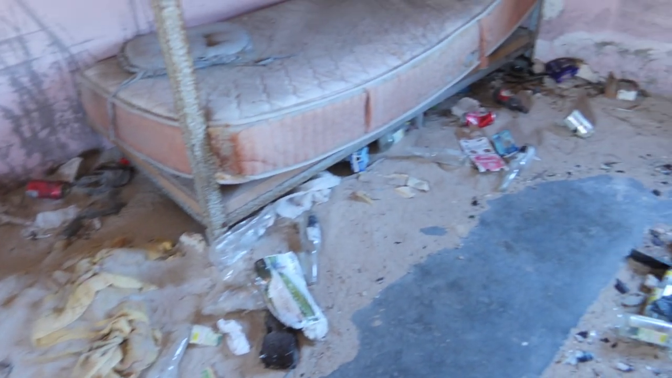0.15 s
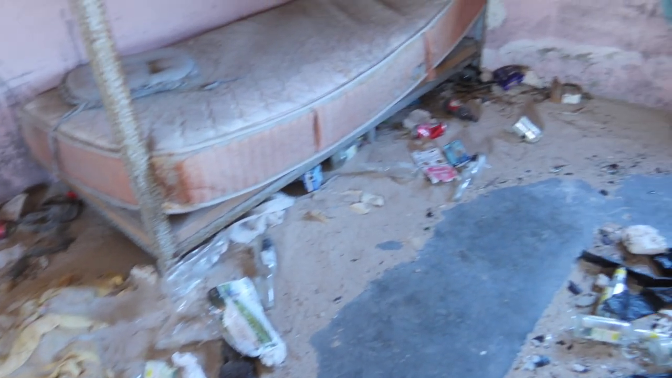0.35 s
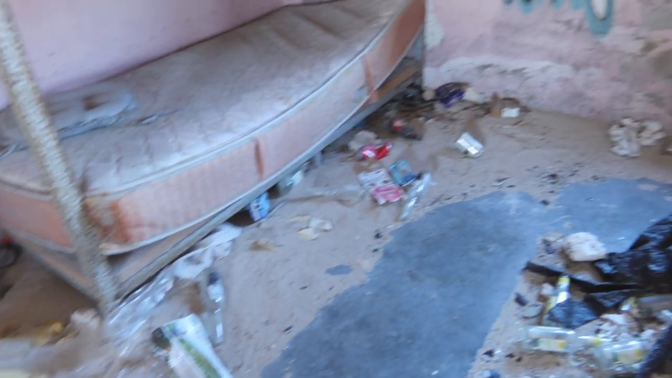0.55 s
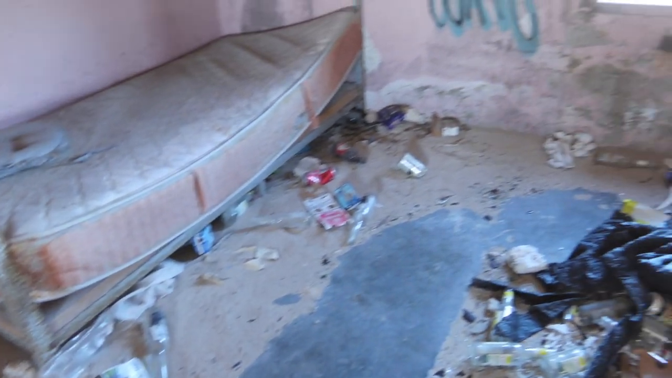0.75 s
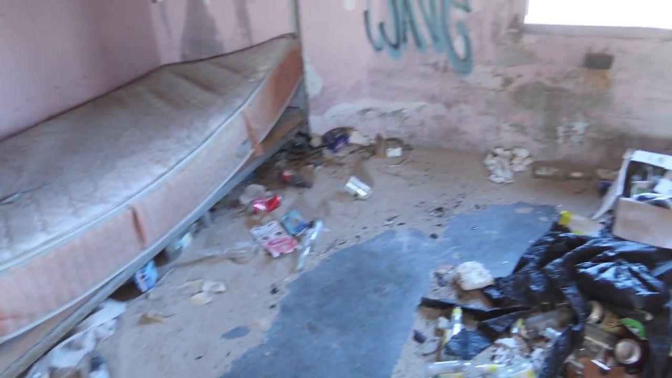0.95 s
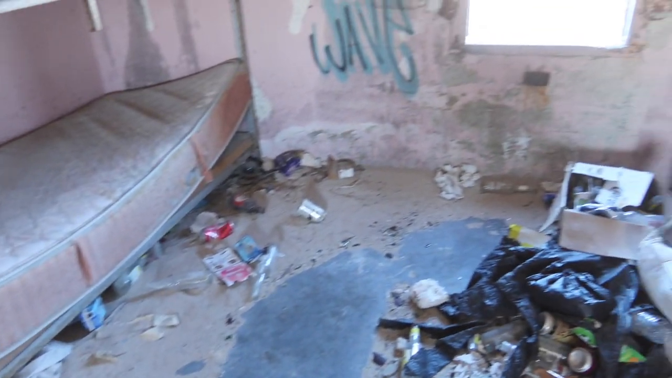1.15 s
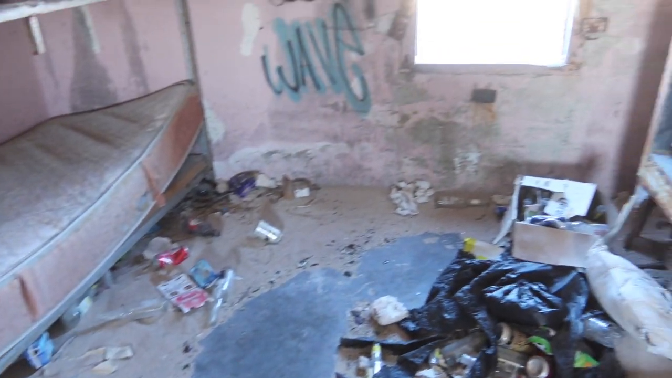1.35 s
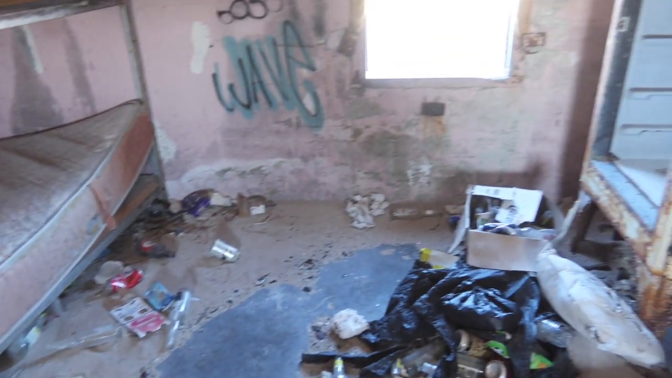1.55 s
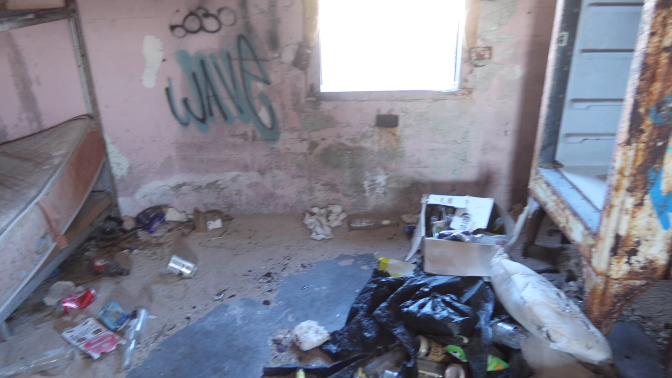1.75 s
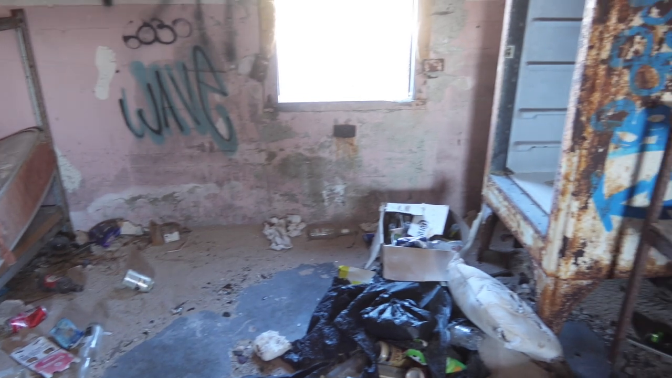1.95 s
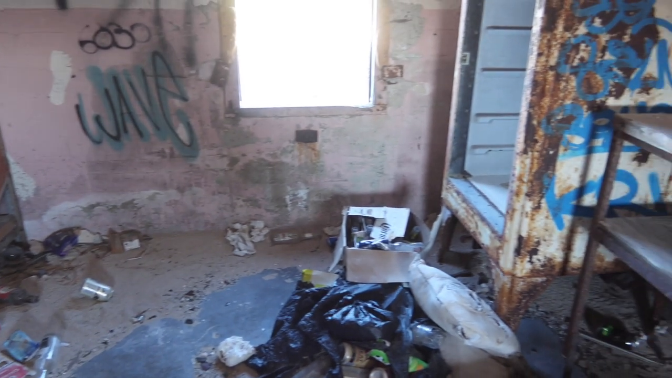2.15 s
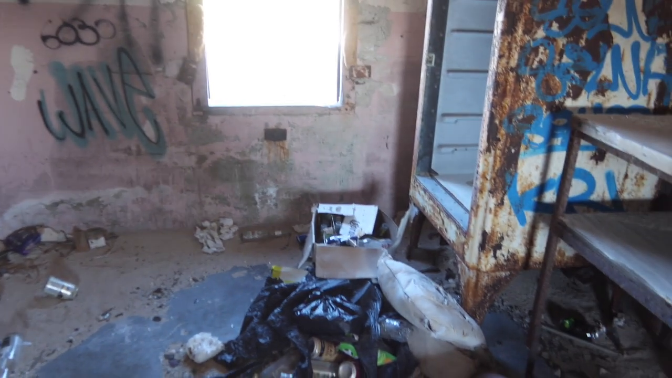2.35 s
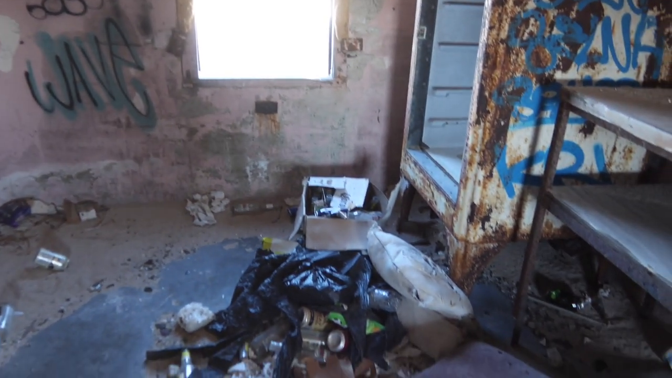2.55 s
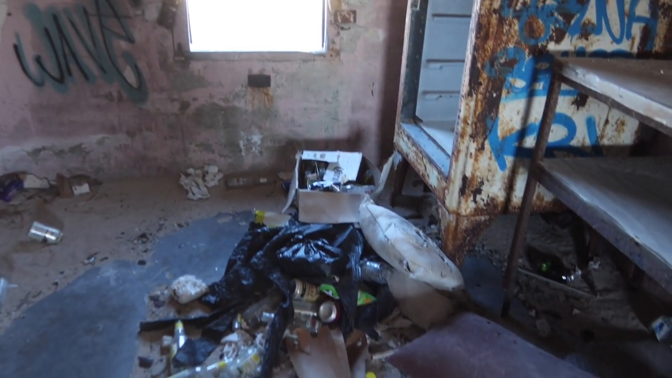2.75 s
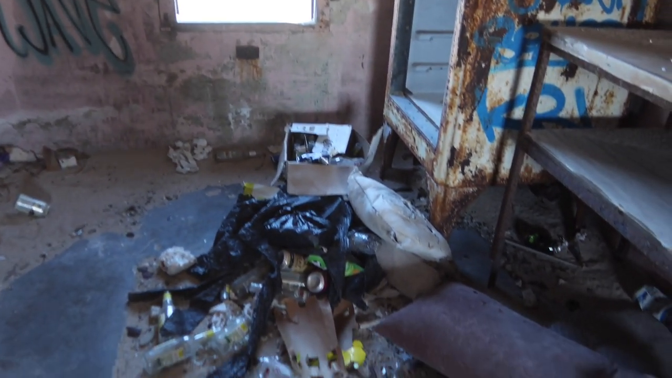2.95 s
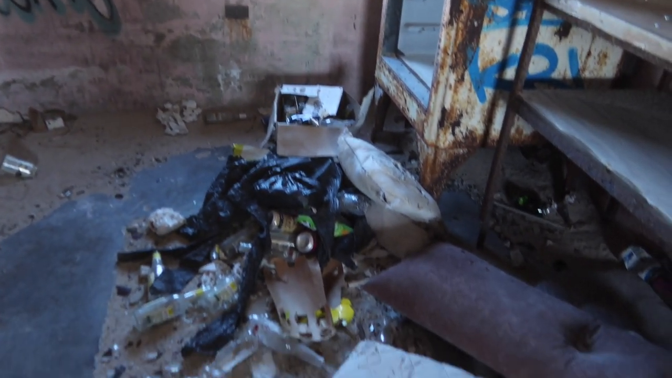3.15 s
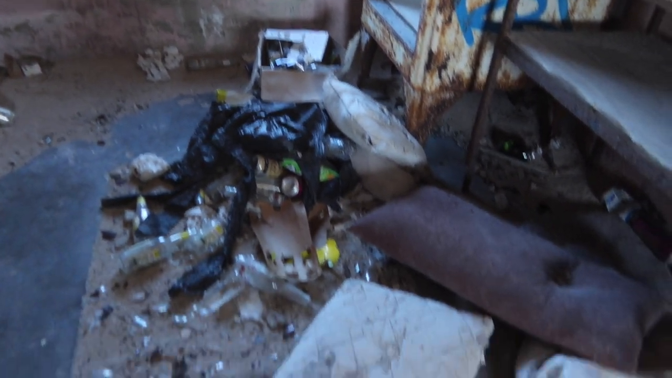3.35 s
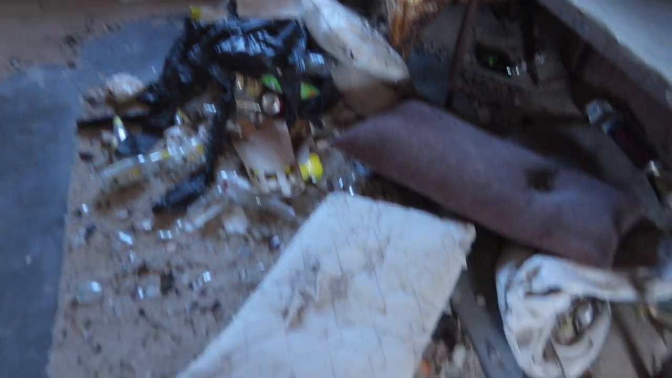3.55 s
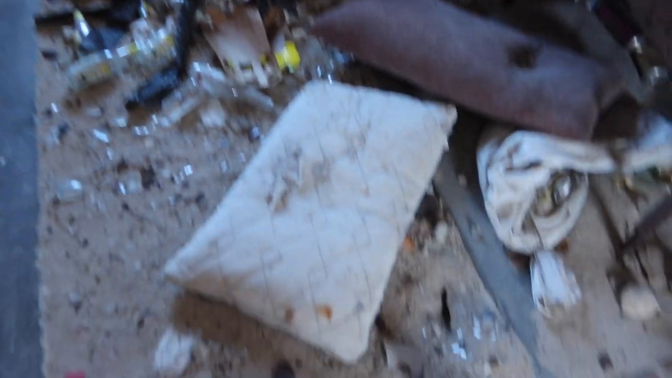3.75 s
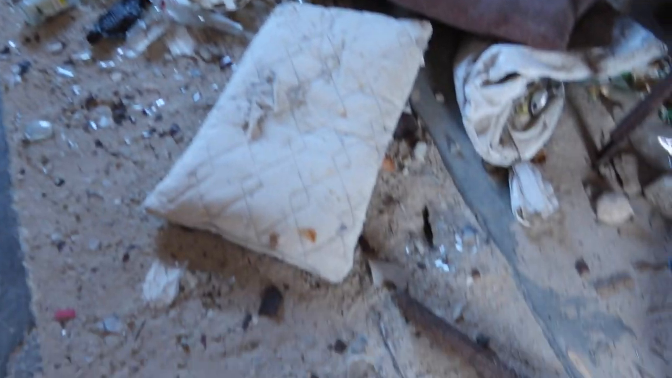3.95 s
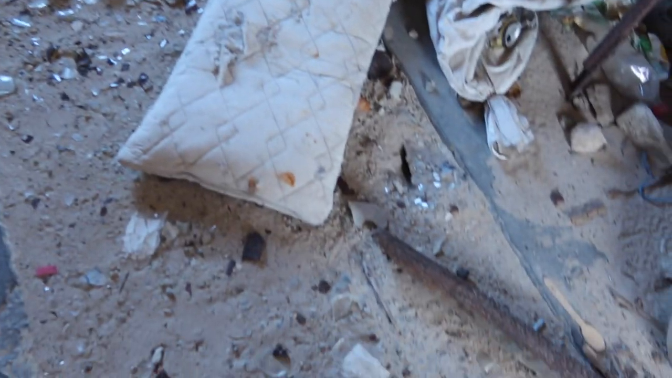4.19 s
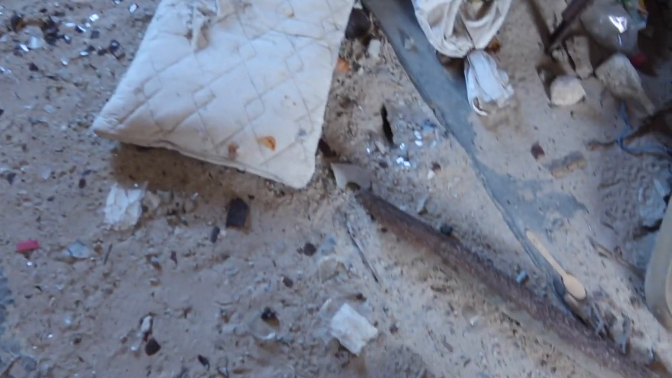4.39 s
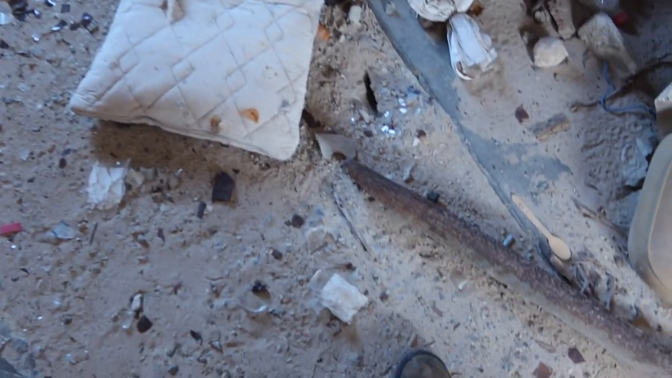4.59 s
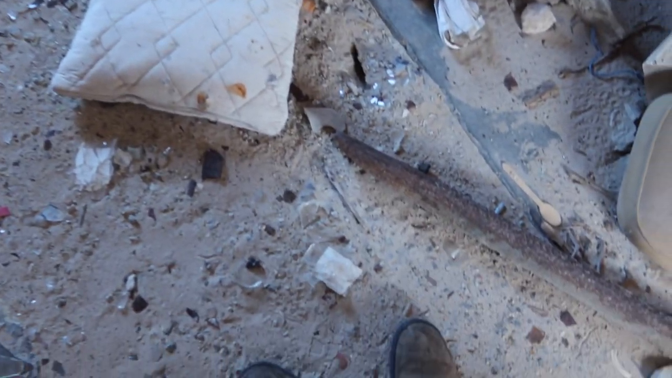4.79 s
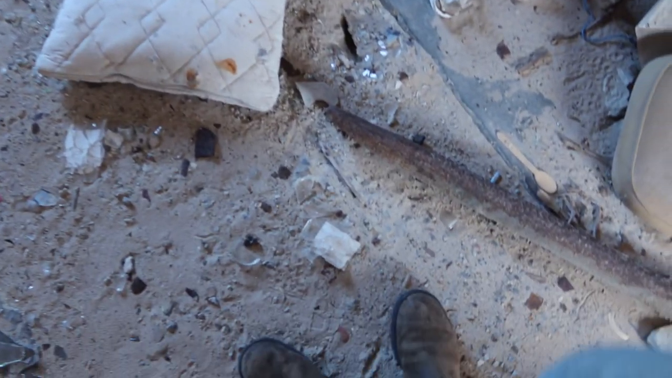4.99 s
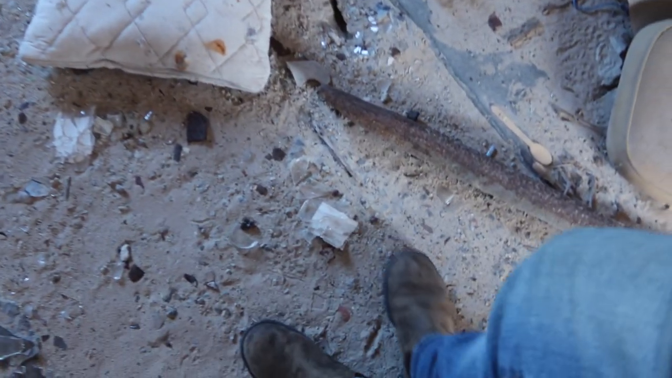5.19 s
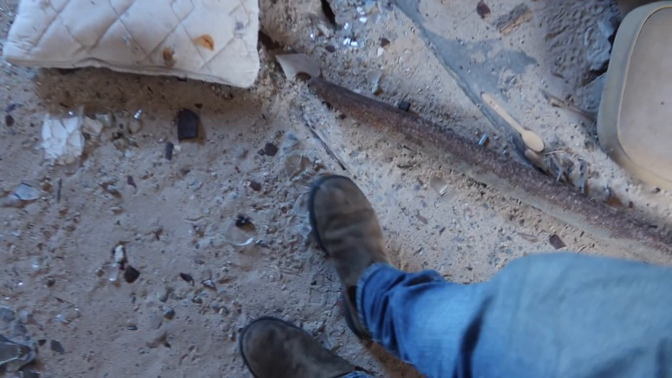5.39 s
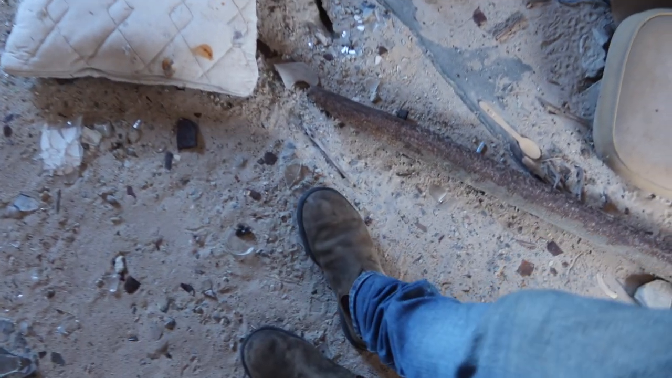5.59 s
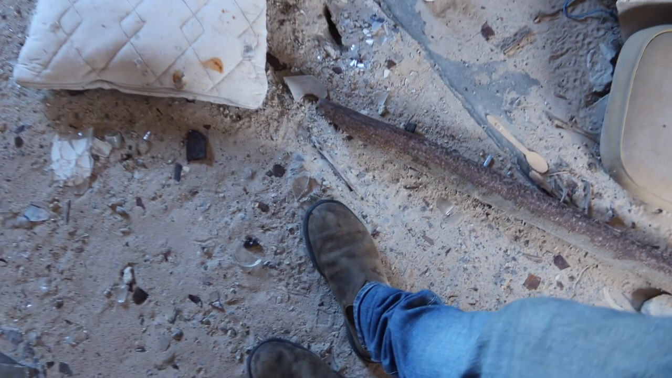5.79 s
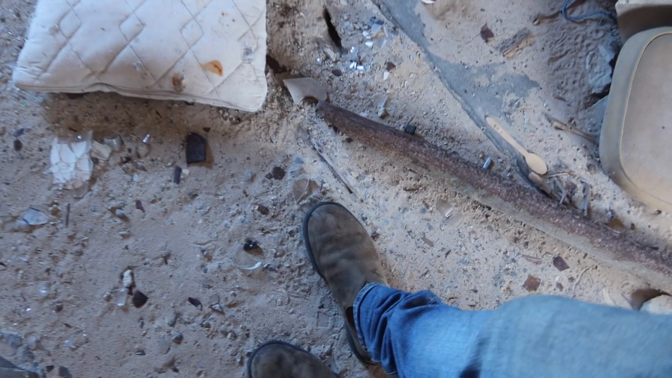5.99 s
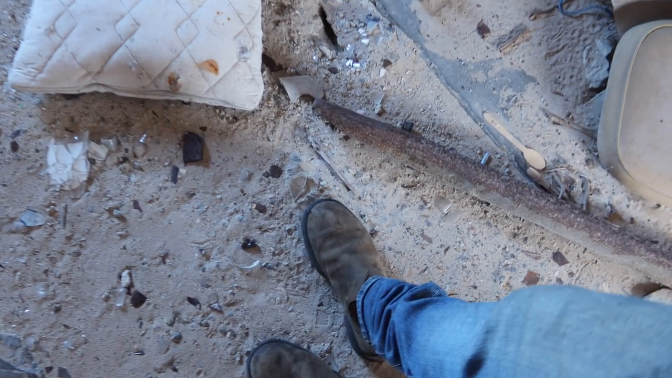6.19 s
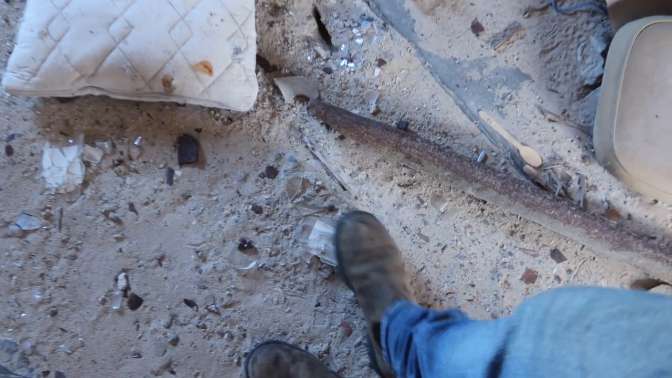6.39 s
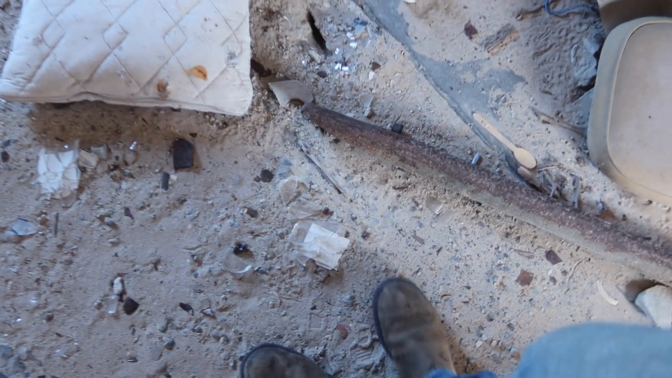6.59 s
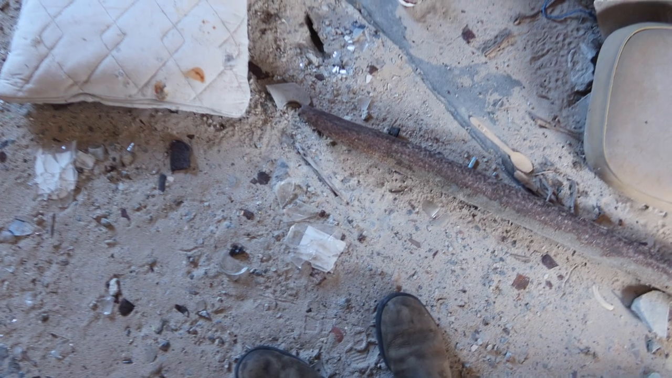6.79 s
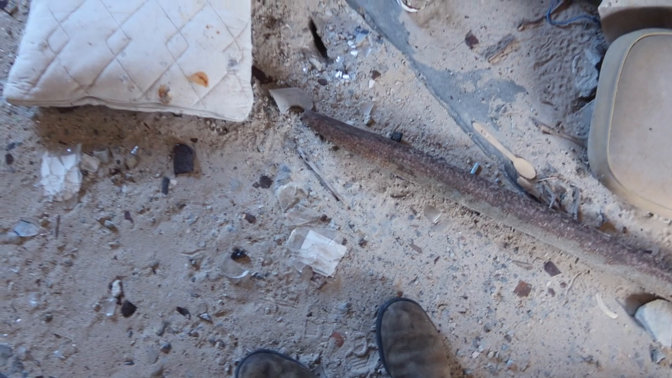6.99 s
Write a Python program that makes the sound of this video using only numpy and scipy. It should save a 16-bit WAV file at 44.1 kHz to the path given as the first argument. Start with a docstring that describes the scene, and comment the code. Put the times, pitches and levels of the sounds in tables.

```python
"""An empty room with a concrete floor, where boots take short steps over grit close to the microphone.
Grains grind and crack under the soles and loose pieces scrape along; two larger pieces snap and
overload the microphone, one of them ringing like glass. A few light clinks fall in a pause, then one
boot presses down hard on the grit, twists and is drawn back. Bare walls add a short echo, and the
building's air rumbles softly underneath."""
import sys
import numpy as np
from scipy import signal
from scipy.fft import rfft, irfft
from scipy.io import wavfile
from scipy.ndimage import uniform_filter1d, minimum_filter1d

SR = 44100
rng = np.random.default_rng(int(sys.argv[2]) if len(sys.argv) > 2 else 0)


def wav_record(signal):
    """Record a signal, one row per channel, as 16-bit PCM in the file named by sys.argv[1]."""
    frames = np.transpose(np.atleast_2d(signal))
    bounded = np.clip(frames, -1, 1)
    # unit amplitude maps onto the largest positive 16-bit level
    quanta = np.round(bounded * 32767).astype(np.int16)
    wavfile.write(sys.argv[1], SR, quanta)


N = 310464

# room tone of the building: frequency_hz, relative_db
AIR_SPECTRUM = [(12, -41), (20, 2), (44, -12.5), (154, -9), (187, -10), (328, -13), (472, -13.5),
                (624, -17.5), (718, -17.5), (780, -19.5), (949, -22), (3740, -30.5), (6910, -31),
                (8410, -31), (16000, -34.5)]
# drawn fader curve, the low background ducks after the loud cracks and slowly recovers: time_s, gain_db
BACKGROUND_LEVEL = [(0, 6), (1.2, 0), (2.4, 5), (3.8, 4.5), (5.5, 3), (6.1, -0.5), (7, 4.5)]
# a sole grinding over fine grit: peak_load_s, build_s, let_go_s, level_db, grain_pitch_hz
SOLE_STROKES = [(0.039, .1, 0.22, -49, 5200), (.28, 0.0381, 0.16, -42, 4800),
                (.375, 0.0064, .06, -38, 4440), (.475, .035, .14, -41, 4660),
                (.535, 0.0066, 0.1, -32.5, 4130), (0.594, 0.0093, .16, -29.5, 2300),
                (.805, .01, 0.094, -38.5, 4150), (1.156, 0.0052, .1, -41.5, 2280),
                (1.183, 0.0074, .12, -36.5, 6160), (1.545, 0.014, 0.035, -45, 5800),
                (1.689, 0.011, 0.095, -40.5, 4600), (1.756, 0.0096, 0.089, -40, 4000),
                (2.009, 0.078, 0.068, -42.5, 5000), (2.64, 0.024, .12, -53, 2200),
                (5.582, 0.026, .16, -38, 5600), (5.695, .016, 0.044, -20.5, 6800),
                (5.74, .16, .2, -35.5, 5600), (5.899, 0.11, 0.22, -36, 3060),
                (6.219, .07, 0.176, -45, 3480), (6.35, 0.0758, 0.085, -41, 4300),
                (6.451, .05, 0.088, -45.5, 4840), (6.72, .006, 0.038, -43, 4200)]
# the biggest grains bursting, levels taken over 1 ms: start_s, level_db, pitch_hz, splinter_amount
GRAIN_CRACKS = [(0.122, -27.5, 3640, .1), (0.243, -28, 3900, 0.27), (0.3286, -25.5, 4980, 0.26),
                (0.3712, -21.5, 3450, 0.9), (0.4434, -28, 3000, 0.04), (0.4672, -27, 4870, .5),
                (0.491, -21, 5040, 0.8), (0.511, -22, 5040, 0.2), (0.53, -13, 5000, 0.02),
                (0.546, -18.5, 4170, .25), (0.6709, -15.5, 2900, 0.4), (0.7961, -18, 1640, 1),
                (0.8043, -21, 3300, 1), (0.814, -16, 1420, 1), (0.9367, -24, 3710, .4),
                (0.942, -23, 3640, 0.46), (0.9961, -16.5, 4660, .4), (1.338, -30.5, 6440, 0.01),
                (1.5453, -29.5, 4500, 1), (1.6826, -24.5, 5360, 0.46), (1.7491, -21, 3880, 0.86),
                (1.9153, -31, 6040, .4), (2.0023, -24.5, 5260, 0.77), (5.1769, -42, 1590, 0.56),
                (5.2876, -43, 8260, 0.18), (5.609, -21, 4100, 1), (5.6372, -19.5, 2770, 0),
                (5.6439, -16.5, 5450, 0.95), (5.6995, -19, 2220, 0.8), (5.7763, -16, 3300, 0.2),
                (5.7806, -12.5, 7600, 0.1), (5.7945, -1.5, 1020, 0.04), (5.8396, -14.5, 2400, 0.13),
                (5.8615, -11.5, 3680, 0.37), (5.872, -12.5, 3500, 0.36), (5.8958, -7.5, 2220, 0.02),
                (5.9313, -13, 3000, .4), (5.978, -8.5, 2590, 0.42), (5.9824, -12.5, 2470, .3),
                (6.0049, -10, 2480, .1), (6.0268, -18, 2440, 0.35), (6.09, -33.5, 3370, 0.9),
                (6.1657, -34, 3480, .4), (6.1984, -18.5, 3120, 0.35), (6.2452, -24, 3150, 0.83),
                (6.355, -21.5, 1670, 0.3), (6.4271, -25, 656, 0), (6.6128, -37.5, 5760, .85),
                (6.678, -30, 955, 0.01), (6.9443, -29, 1610, 0.05), (7.0311, -32, 8700, 0)]
# loose pieces dragged along the concrete: start_s, length_s, level_db, pitch_hz
DRAGGED_PIECES = [(0.364, 0.12, -46.5, 2280), (0.52, 0.034, -31, 2240), (0.812, 0.082, -45, 1210),
                  (1.179, 0.023, -26.5, 6440), (1.178, 0.045, -38.5, 12500), (1.679, 0.12, -45.5, 2010),
                  (5.674, 0.046, -28, 13400), (5.684, 0.024, -27.5, 1110), (6.335, 0.037, -38.5, 1580),
                  (6.344, 0.031, -41, 14400)]
# larger pieces breaking, levels taken over 1 ms: start_s, level_db, ring_gain_db
FRACTURES = [(0.5813, 9, -77), (0.5834, 4.5, -54), (0.9576, 0.5, -9.5)]
# tone of a break: frequency_hz, relative_db
FRACTURE_EQ = [(40, -37), (120, 0.5), (220, -5), (600, 0.5), (1300, 0), (2200, -4), (3500, -5),
               (6000, -1.5), (9000, -7.5), (16000, -13.5)]
# ring of a glass shard: pitch_hz, level_db, t60_s
SHARD_MODES = [(2950, -22.5, 0.1), (3390, -15, .12), (5360, -11.5, 0.27), (5403, -9, 0.11),
               (8920, -18, 0.19), (10900, -5.5, 0.11), (11890, -12.5, 0.083), (11900, 2, 0.056),
               (12600, -3, .02)]
# the heel thumping through the floor: start_s, gain_db, pitch_hz
HEEL_DROPS = [(.586, -23, 190), (.961, -24, 220), (5.796, -15, 210)]
# the boot's weight coming onto the floor: start_s, length_s, level_db, pitch_hz
FOOTFALLS = [(0.793, 0.036, -36.5, 890), (1.143, 0.14, -42, 600), (1.959, 0.098, -50.5, 450),
             (2.045, 0.043, -41.5, 920), (2.624, 0.0544, -47.5, 484), (2.71, 0.27, -52, 444),
             (5.058, 0.013, -45.5, 600), (5.474, 0.06, -48.5, 825), (5.54, 0.0504, -38.5, 766),
             (5.679, 0.043, -27.5, 1090), (5.808, 0.048, -32.5, 960), (6.416, 0.051, -37, 530),
             (6.681, 0.021, -42, 890), (6.71, 0.038, -32.5, 663)]
# light knocks in the litter: start_s, gain_db
LITTER_NUDGES = [(3.6765, -41.5), (3.7295, -48), (3.7636, -26.5)]
# ring of the nudged piece: pitch_hz, level_db, t60_s
LITTER_MODES = [(5000, -11, 0.0091), (5600, 13.5, 0.0056), (6100, -4, 0.0041), (11900, -5.5, 0.0081)]
# reverb send, higher while the microphone faces away from the feet: time_s, send_db
ROOM_SEND = [(.4, -6.5), (1, -2), (3.8, -3), (5.6, -7.5), (6.7, -6)]
# reverb decay: frequency_hz, t60_s
ROOM_DECAY = [(150, 0.585), (400, 0.36), (1000, 0.34), (2800, 0.28), (7000, 0.25), (15000, 0.21)]
# reverb tone: frequency_hz, relative_db
ROOM_EQ = [(100, 4.5), (1000, -1.5), (2300, 4), (4000, 2.5), (8000, 0), (16000, -4.5)]

LOW_CUT_HZ, HIGH_CUT_HZ = 130, 16000
ONE_MS_GAIN = np.sqrt(SR / 1000)  # brings a hit of energy 1 to 0 dB over 1 ms


def amp(db):
    """Decibels to gain."""
    return 10 ** (np.asarray(db) / 20)


def unit(x):
    """Scales to energy 1 along the last axis."""
    return x / np.sqrt(np.sum(x ** 2, -1, keepdims=True) + 1e-20)


def value_at(points, hz):
    """A spectrum's value at hz, on a log axis."""
    point_hz, value = np.transpose(points)
    return np.interp(np.log(hz + 1), np.log(point_hz), value)


def automation(points):
    """A control's value at every sample."""
    return np.interp(np.arange(N) / SR, *np.transpose(points))


def add(mix, start_s, sound):
    """Drops a sound onto the timeline."""
    part = mix[max(round(start_s * SR), 0):][:len(sound)]
    part += sound[:len(part)]


def band(x, hz, kind, order=2):
    """A causal high-pass or low-pass."""
    return signal.sosfilt(signal.butter(order, min(hz, SR / 2 - 1), kind, fs=SR, output="sos"), x)


def grain_bursts(hz, splinter, decay_cycles=0.69, splinter_s=0.00046, late_s=0.0005, count=6, size=320):
    """One row a grain: a heavily damped ping, then a few bright splinters, each at its own pitch."""
    t, hz = np.arange(size) / SR, hz[:, None]
    share = np.clip(splinter, 0, 1)[:, None]
    ping = np.sin(2 * np.pi * hz * t) * (t * hz) ** 0.3 * np.exp(-t * hz / decay_cycles)
    detune, delay, strength = np.moveaxis(rng.random((len(hz), 3, count, 1)), 1, 0)
    splinter_hz = 4600 * (HIGH_CUT_HZ / 4600) ** ((np.arange(count)[:, None] + detune) / count)
    age = np.maximum(t + late_s * np.log(1 - delay), 0)
    spray = (strength * np.sin(2 * np.pi * splinter_hz * age) * np.exp(-age / splinter_s)).sum(1)
    spray = band(spray, 17000, "low", order=3)
    return np.sqrt(1 - share) * unit(band(ping, 310, "high")) + np.sqrt(share) * unit(spray)


def sole_pressure(t, build_s, let_go_s, build_db=10.5, let_go_db=15):
    """The grinding's envelope: weight builds on the sole up to t = 0, then lets go."""
    return amp(np.minimum(build_db * t / build_s, -let_go_db * t / let_go_s))


def building_air(gain_db=-52, rumble_hz=2500):
    """The bed: an even hiss over a soft rumble, which is faded down after the loud cracks and back up."""
    hz = np.fft.rfftfreq(N, 1 / SR)
    noise = irfft(rfft(rng.standard_normal(N)) * amp(value_at(AIR_SPECTRUM, hz)), N)
    noise = unit(noise) * np.sqrt(N) * amp(gain_db)
    spectrum = rfft(noise) * np.hypot(1, LOW_CUT_HZ / (hz + 10))  # bass lift below the low cut
    rumble = irfft(spectrum / (1 + (hz / rumble_hz) ** 2), N)
    return irfft(spectrum, N) + rumble * (amp(automation(BACKGROUND_LEVEL)) - 1)


def grit_scuffs(grains_per_s=3500, spread_db=6.5, pitch_spread=0.47, all_splinter_hz=9000, most=1600):
    """Each stroke crushes a swarm of uneven grains; the finer the grit, the more it splinters."""
    out = np.zeros(N)
    for peak_s, build_s, let_go_s, db, pitch_hz in SOLE_STROKES:
        length_s = build_s + let_go_s
        count = min(int(grains_per_s * length_s), most)
        t = rng.random(most)[:count] * length_s - build_s
        scatter = rng.standard_normal(most)[:count]
        bulk = np.minimum(rng.exponential(1, most)[:count], 3)
        hz = np.clip(pitch_hz * np.exp(pitch_spread * scatter), 500, 15000)
        grains = grain_bursts(hz, hz / all_splinter_hz, decay_cycles=0.62, size=160)
        gain = unit(amp(spread_db * bulk)) * amp(db) * np.sqrt(length_s * SR)
        gain *= sole_pressure(t, build_s, let_go_s)
        for start_s, grain in zip(peak_s + t, grains * gain[:, None]):
            if start_s > 0:
                add(out, start_s, grain)
    return out


def grit_pops(pops_per_s=85, lift_db=10, spread_db=3, pitch_spread=0.51, splinter=0.31, count=40):
    """Coarser grains give way under the moving sole and crackle on top of the grinding."""
    out = np.zeros(N)
    for peak_s, build_s, let_go_s, db, pitch_hz in SOLE_STROKES:
        t = (np.arange(count) + rng.random(count)) / pops_per_s - build_s
        scatter, bulk = rng.standard_normal((2, count))
        grains = grain_bursts(pitch_hz * np.exp(pitch_spread * scatter), np.full(count, splinter))
        gain = sole_pressure(t, build_s, let_go_s) * amp(db + lift_db + spread_db * bulk)
        gain = np.minimum(gain, amp(-22)) * ONE_MS_GAIN
        for start_s, grain in zip(peak_s + t, grains * gain[:, None]):
            if 0 < start_s < peak_s + let_go_s:
                add(out, start_s, grain)
    return out


def grain_cracks(splinter_scale=0.95, second_db=-8.5, second_lag_s=0.0016, second_pitch_ratio=1.27):
    """Grains big enough to be heard one by one: each breaks, then its smaller half breaks again."""
    out = np.zeros(N)
    first_s, db, hz, splinter = np.transpose(GRAIN_CRACKS)
    gain = amp(db)[:, None] * ONE_MS_GAIN
    second_s = first_s + second_lag_s * (0.5 + 0.5 * rng.random(len(first_s)))
    for starts, pitch_hz, trim_db in (first_s, hz, 0), (second_s, hz * second_pitch_ratio, second_db):
        grains = grain_bursts(pitch_hz, splinter_scale * splinter) * gain * amp(trim_db)
        for start_s, grain in zip(starts, grains):
            add(out, start_s, grain)
    return out


def debris_scrapes(slips_per_s=2500, attack_share=0.18, release_share=0.2):
    """Quick, uneven slips keep a dragged piece singing at its own pitch."""
    out, t = np.zeros(N), np.arange(SR // 100) / SR
    for start_s, length_s, db, hz in DRAGGED_PIECES:
        count = int(length_s * SR)
        progress = np.linspace(0, 1, count)
        ramp = np.minimum(progress / attack_share, (1 - progress) / release_share)
        contact = np.sin(np.pi / 2 * np.clip(ramp, 0, 1))
        slips = rng.standard_normal(SR) * (rng.random(SR) < slips_per_s / SR)
        width_hz = 450 + 0.058 * hz
        resonance = t * np.exp(-np.pi * width_hz * t) * np.sin(2 * np.pi * hz * t)
        scrape = np.convolve(slips[:count] * contact, resonance)
        add(out, start_s, unit(scrape) * amp(db) * np.sqrt(count))
    return out


def ring(modes):
    """Dying sines of a struck object."""
    t = np.arange(SR // 2) / SR
    return sum(amp(db - 60 * t / t60) * np.sin(2 * np.pi * hz * t) for hz, db, t60 in modes)


def debris_snaps(crumble_s=0.0015, crumble_db=-3, crumble_hz=900, size=2048):
    """A fracture is one sharp transient and a brief crumble, with the shard ringing on."""
    out, t = np.zeros(N), np.arange(size) / SR
    log_gain = np.log(amp(value_at(FRACTURE_EQ, abs(np.fft.fftfreq(size, 1 / SR)))))
    # minimum phase: nothing sounds before the break
    body = np.fft.ifft(np.exp(np.conj(signal.hilbert(log_gain)))).real
    for start_s, db, ring_db in FRACTURES:
        crumble = band(rng.standard_normal(size) * np.exp(-t / crumble_s), crumble_hz, "high")
        force = (t == 0) + amp(crumble_db) * unit(crumble)
        snap = band(signal.fftconvolve(force, body), 200, "high")
        add(out, start_s, unit(snap) * amp(db) * ONE_MS_GAIN)
        add(out, start_s, amp(ring_db) * ring(SHARD_MODES))
    return out


def heel_thumps(decay_s=0.0036):
    """When a piece gives way, the heel drops the last bit onto the floor."""
    out, t = np.zeros(N), np.arange(SR // 10) / SR
    for start_s, db, hz in HEEL_DROPS:
        thump = np.sin(2 * np.pi * hz * t) * np.exp(-t / decay_s)
        add(out, start_s, amp(db) * band(thump, 190, "high"))
    return out


def sole_treads(low_ratio=0.44, high_ratio=1.54, lumpy_db=3, taper=0.58):
    """The rubber sole meets the uneven floor in a quick, dull patter."""
    out = np.zeros(N)
    for start_s, length_s, db, hz in FOOTFALLS:
        count = int(length_s * SR)
        push = rng.standard_normal(SR)[:count] * signal.windows.tukey(count, taper)
        lumps = np.interp(np.arange(count), np.linspace(0, count, 16), rng.standard_normal(16))
        push = np.pad(push * amp(lumpy_db * lumps), (0, SR // 20))
        patter = band(band(push, hz * low_ratio, "high"), hz * high_ratio, "low")
        add(out, start_s, unit(patter) * amp(db) * np.sqrt(count))
    return out


def litter_clinks(attack_s=0.00012):
    """Something small and hard is nudged in the litter and rings for an instant."""
    out, t = np.zeros(N), np.arange(SR // 2) / SR
    for start_s, db in LITTER_NUDGES:
        add(out, start_s, amp(db) * ring(LITTER_MODES) * (1 - np.exp(-t / attack_s)))
    return out


def microphone_aim(x, shelf_hz=8000, neutral_db=-6):
    """The grit is brightest with the microphone on the feet: a high shelf rises as the send falls."""
    hz = np.fft.rfftfreq(N, 1 / SR)
    treble = irfft(rfft(x) * hz ** 4 / (hz ** 4 + shelf_hz ** 4), N)
    return x + treble * (amp(neutral_db - automation(ROOM_SEND)) - 1)


def bare_walls(predelay_s=0.0046, early_s=0.02, early_db=5):
    """A few distinct early reflections melt into a short tail whose treble dies first."""
    t = np.arange(SR) / SR
    taps = rng.standard_normal(SR) * (t > predelay_s)
    spikiness = np.minimum(rng.exponential(1, SR), 4) - 2
    taps *= amp(early_db * np.exp(-t / early_s) * spikiness)
    hz, frame_s, spectra = signal.stft(taps, SR, nperseg=256)
    spectra *= amp(value_at(ROOM_EQ, hz)[:, None] - 60 * frame_s / value_at(ROOM_DECAY, hz)[:, None])
    return unit(signal.istft(spectra, SR, nperseg=256)[1])


def room_reverb(x, count=3, crossfade_hz=4):
    """Crossfades between several echo patterns so the tail stays smooth, without ringing tones."""
    phase = 2 * np.pi * crossfade_hz * np.arange(N) / SR
    send = x * amp(automation(ROOM_SEND)) * np.sqrt(2 / count)
    feeds = (send * np.cos(phase + np.pi * k / count) for k in range(count))
    return sum(signal.fftconvolve(feed, bare_walls())[:N] for feed in feeds)


def scene():
    """The mono mix: five layers underfoot, each with its own reverb send, over the room tone."""
    coarse = microphone_aim(grain_cracks())
    fine = microphone_aim(grit_pops() + grit_scuffs())
    soles = sole_treads() + heel_thumps()
    snaps = debris_snaps()
    litter = debris_scrapes() + litter_clinks()
    send = amp(-4.5) * coarse + amp(-5.5) * fine + amp(-1) * soles + amp(-8.5) * snaps + amp(-7.5) * litter
    return (coarse + fine + soles + snaps + litter + room_reverb(send) + building_air())[None]


def record(dry, ceiling=1.35, window=21):
    """A fast limiter holds down the loudest hits, what is still over clips; then low and high cuts."""
    gain = np.minimum(1, ceiling / (abs(dry) + 1e-9))
    gain = uniform_filter1d(minimum_filter1d(gain, window), window)
    clipped = np.clip(dry * gain, -1, 1)
    high_cut = signal.firwin(301, HIGH_CUT_HZ, window=("kaiser", 8), fs=SR)
    return signal.oaconvolve(band(clipped, LOW_CUT_HZ, "high", order=1), high_cut[None], "same")


dry = scene()
out = record(dry)
wav_record(out)
```